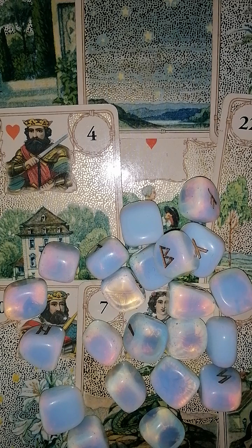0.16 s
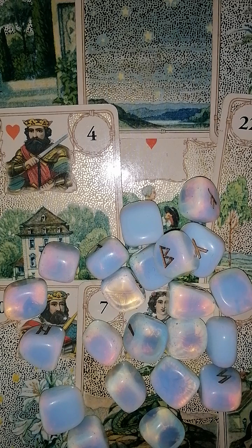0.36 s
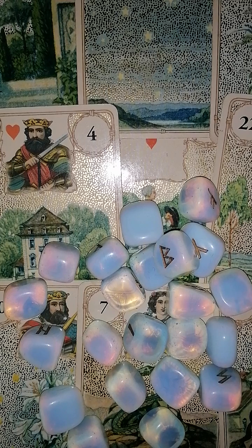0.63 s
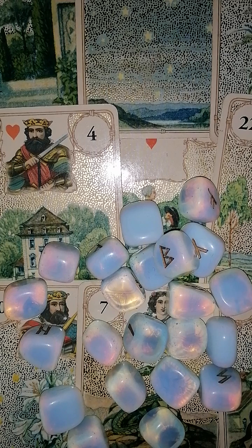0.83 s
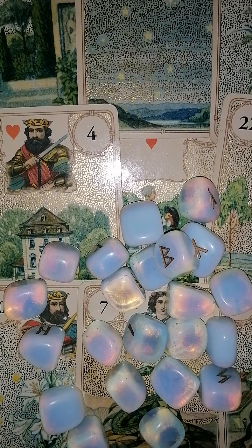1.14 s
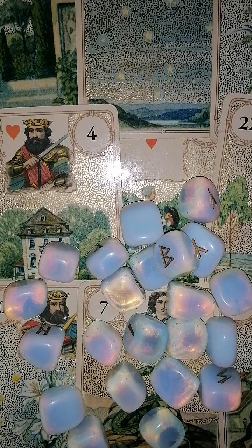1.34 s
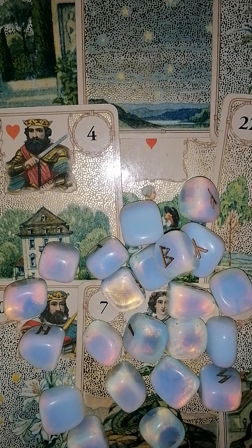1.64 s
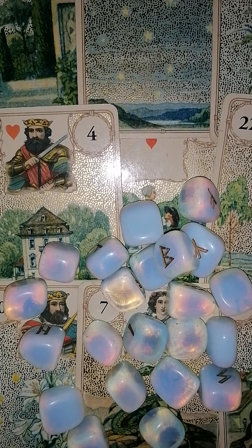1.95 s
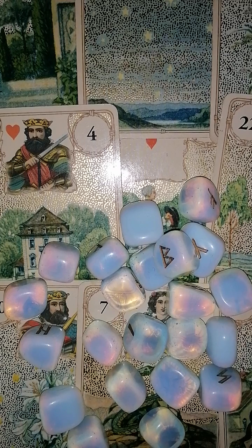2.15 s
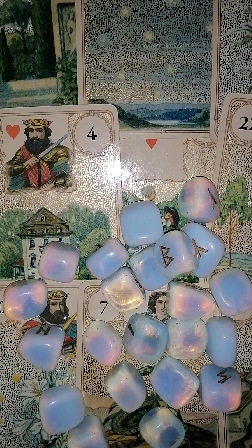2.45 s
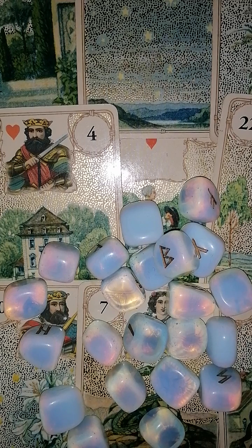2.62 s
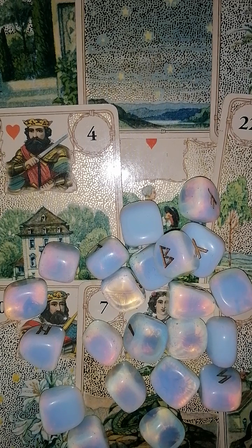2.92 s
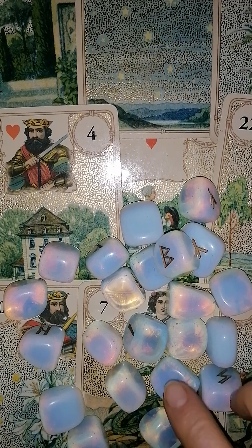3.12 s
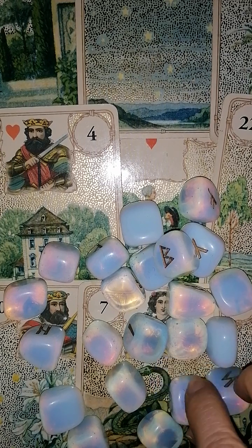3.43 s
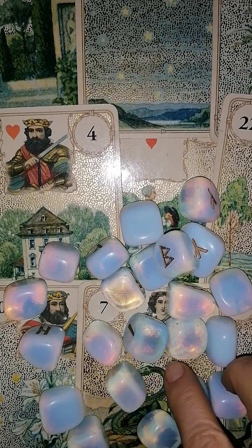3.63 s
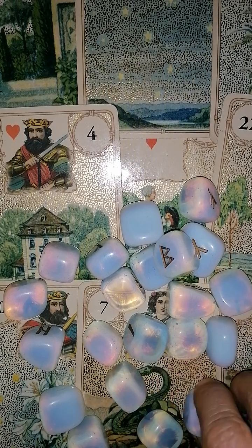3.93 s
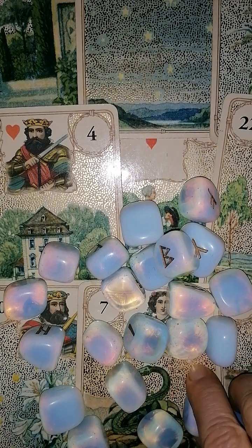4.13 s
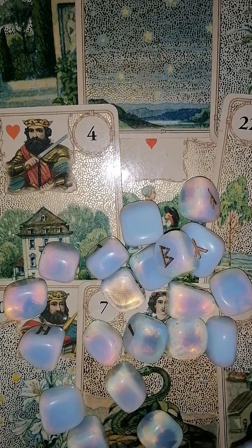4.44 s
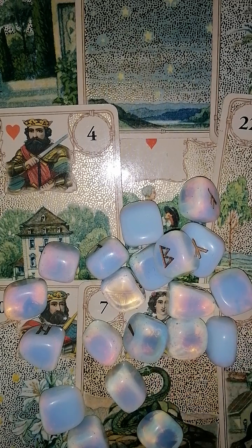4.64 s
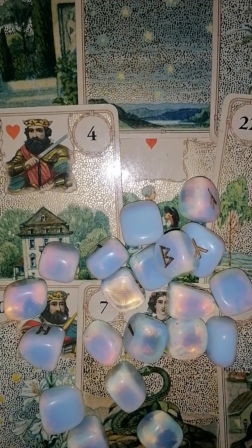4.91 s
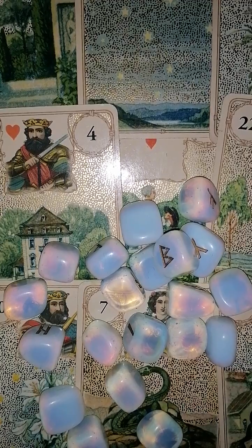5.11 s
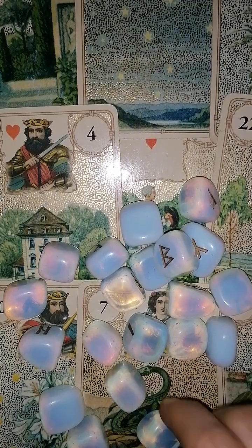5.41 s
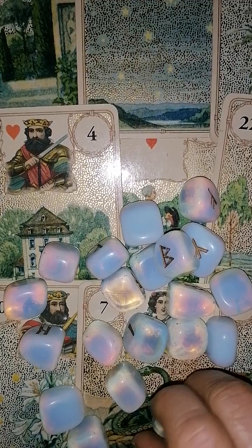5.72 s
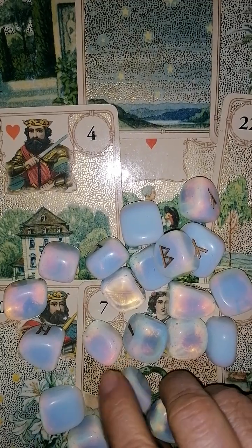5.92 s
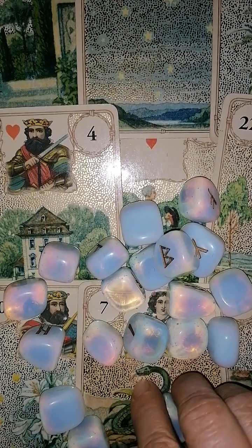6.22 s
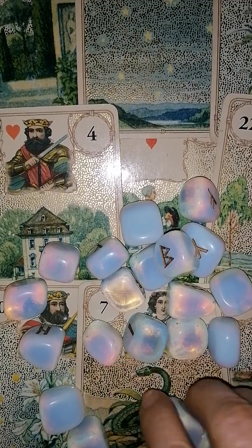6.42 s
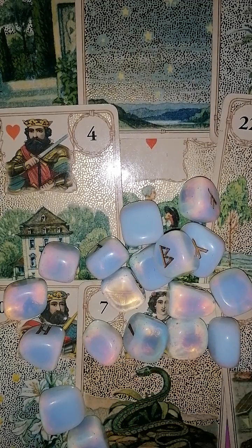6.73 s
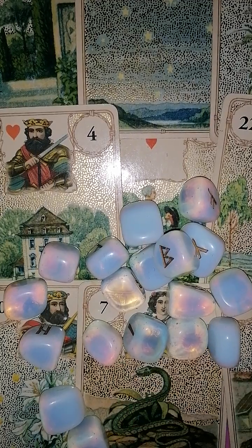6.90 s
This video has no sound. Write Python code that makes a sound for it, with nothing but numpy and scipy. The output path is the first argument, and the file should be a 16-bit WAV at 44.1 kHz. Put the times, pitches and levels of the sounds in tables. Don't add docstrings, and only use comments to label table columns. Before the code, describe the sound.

A quiet small room, heard closely in stereo, with soft low hum and barely audible finger movement for the first 1.5 seconds. At about 1.6 s stones tick lightly together; at 1.8 s one raps a hollow box rim, a short ringing knock. Tiny bouncing ticks come at 2.4-2.7 s with a soft thump. At 2.8 s a stone drops into the box: a loud woody knock and quick smaller bounces until 2.9. From 3 to 5 s stones are pinched off cards with bright ticks, one sharp at 3.54, papery brushes, and dull table thuds, heaviest around 4.7. At 5.15-5.4 s a handful falls in, loud knocks and clicks crowding, then shrinking. A weaker knock comes at 5.8, crisp glassy clicks at 6.1-6.2 toward one side, small ticks at 6.36 and 6.8, and soft skin rubbing fading to quiet at 7 s.

```python
import sys
import numpy as np
from scipy import signal
from scipy.fft import rfft, irfft, next_fast_len
from scipy.io import wavfile
from scipy.ndimage import uniform_filter1d, map_coordinates

SR = 44100
rng = np.random.default_rng(int(sys.argv[2]) if len(sys.argv) > 2 else 0)


def convert_level_to_amplitude(level_db):
    exponent = np.asarray(level_db, float) / 20
    return 10 ** exponent


def to_wav(sig):
    pcm = np.clip(np.atleast_2d(sig), -1, 1) * 32767
    pcm = np.round(pcm).astype(np.int16)
    wavfile.write(sys.argv[1], SR, pcm.T)


N = 311346

# (frequency [Hz], level [dB])
AIR_SPECTRUM = [(12, -33.5), (20, 0), (44, -5), (59, -32), (122, -15.5), (152, -12.5), (205, -22),
                (350, -23), (681, -36.5), (3140, -41), (8300, -52), (10700, -53.5), (15300, -57.5)]
# (frequency [Hz], likeness [0-1])
AIR_LIKENESS = [(60, 0.88), (240, 0.75), (950, 0.065), (3770, 0.053), (15000, 0.5)]
# (frequency [Hz], t60 [s])
ROOM_DECAY = [(150, 0.51), (800, 0.21), (3000, 0.38), (7000, 0.26), (13000, 0.21)]
# (frequency [Hz], gain [dB])
PORT_RESPONSE = [(1000, 0), (3000, -.6), (6000, .6), (10000, -2), (12500, -9), (15000, -16), (17000, -24)]
# (time [s], half length [s], frequency [Hz], width [Hz], level [dB])
FAINT_SWELLS = [(0.099, .04, 2970, 700, -81), (0.458, .03, 262, 80, -67), (0.532, .05, 5500, 3000, -86),
                (1.02, .05, 10500, 2500, -87), (1.09, 0.035, 153, 39.8, -68.5), (3.453, .03, 2130, 203, -65),
                (4.037, 0.033, 1030, 500, -72), (4.038, 0.048, 2990, 1200, -74.5), (4.61, 0.015, 2650, 300, -57),
                (4.65, .045, 2660, 150, -65), (6.75, 0.1, 3960, 300, -72), (1.53, 0.032, 3060, 800, -74.5),
                (1.58, .014, 2970, 900, -59.5), (1.58, .014, 5400, 900, -61), (6.17, 0.05, 2000, 1790, -70),
                (2.129, 0.062, 485, 303, -72), (3.762, 0.048, 905, 600, -77.5), (6.718, 0.11, 1284, 300, -75.5),
                (2.955, .028, 200, 70, -52), (1.815, .015, 200, 100, -55), (4.581, .005, 3000, 5000, -67)]
# (time [s], level [dB])
TABLE_PUSHES = [(1.78, -61.5), (2.8, -55.5), (3.12, -60), (3.28, -50), (3.45, -50.5), (3.85, -62.5),
                (4.15, -55.5), (4.36, -50.5), (4.55, -55.5), (4.75, -43), (4.871, -60), (5.14, -55.5),
                (5.779, -55.5), (5.98, -70)]
# (time [s], level [dB])
TREMOR = [(0, -80), (2.4, -73), (6.2, -67.5), (7.06, -62.5)]
# (frequency [Hz], width [Hz], level [dB])
LEG_MODES = [(60.5, 53, 0)]
# (time of full speed [s], dull rub [dB], bright rustle [dB])
FINGER_STROKES = [(1.579, -71.5, -80.5), (1.85, -64, -79.5), (2.87, -76, -68), (3.191, -75.5, -84.5),
                  (3.901, -74.5, -73.5), (4.3, -74.5, -78.5), (4.42, -62, -96), (4.779, -71, -75.5),
                  (5.27, -66.5, -63), (5.74, -71.5, -68), (6.112, -70, -76), (6.27, -77, -74),
                  (6.42, -72, -90), (6.74, -69, -73.5)]
# (frequency [Hz], level [dB per Hz])
RUB_SPECTRUM = [(300, -26), (600, 0), (1100, 4.5), (2200, -6.5), (4000, -17.5), (8000, -43)]
# (frequency [Hz], level [dB per Hz])
RUSTLE_SPECTRUM = [(1200, -40.5), (2500, 0.5), (4200, -3), (7000, -6), (11000, -11.5), (15000, -29.5)]
# (time [s], peak [dB], left-right [dB], centre [Hz], t60 [s])
CARD_BRUSHES = [(0.858, -67.5, -4, 1380, 0.67), (2.096, -61.5, -1, 5000, 0.57), (3.403, -59, 9.5, 1875, 1),
                (3.412, -61.5, 5.5, 6400, 0.67), (3.50, -60.5, 15, 5620, 0.56),
                (4.351, -57, 7.5, 5300, 0.31), (4.40, -51.5, 6.5, 2930, 0.24), (4.596, -48, 7, 2630, 0.36),
                (4.698, -44.5, 4, 1770, 0.38), (6.06, -65, 5, 6250, 0.37), (6.259, -48, 12, 5600, 0.12)]
# (time [s], peak [dB], left-right [dB], edge [dB])
HAND_THUDS = [(2.358, -59, -4, -25.5), (2.685, -43.5, 0.5, -6), (3.241, -49.5, 5.5, -4.5),
              (3.399, -39.5, 4.5, -4.5), (3.442, -41.5, 4, -14), (4.336, -41.5, 5, 0.5), (4.36, -47, 2, -9),
              (4.409, -44.5, 5.5, -4.5), (4.477, -54, 4.5, -23), (4.598, -49, 2.5, -3),
              (4.688, -35, 6.5, -7), (4.737, -37, 4.5, -12), (4.767, -33.5, 5.5, -11.5),
              (4.805, -47, -1.5, -22)]
# (frequency [Hz], width [Hz], level [dB])
TABLE_MODES = [(109.9, 31, -6.5), (151, 34, 2), (250.4, 22, 0.5), (293, 41, -4)]
# (frequency [Hz], width [Hz], level [dB])
EDGE_MODES = [(433, 110, 10), (600, 150, -5), (778, 440, -1), (1310, 150, -11)]
# (time [s], peak [dB], left-right [dB], centre [Hz], t60 [s])
CARD_TAPS = [(1.558, -56, 2, 760, 0.12), (1.576, -55.5, -8, 644, 0.029), (1.804, -46, -11, 1080, 0.048),
             (2.356, -64.5, 0.5, 600, 0.048), (3.491, -65, 3, 900, .03), (3.498, -62, 13, 3290, .02),
             (3.515, -63.5, 3, 900, 0.03), (3.543, -57.5, 0.5, 950, 0.029), (3.565, -63.5, 4, 950, 0.029),
             (3.568, -58, 9, 2180, 0.016), (4.003, -57, 1, 1110, 0.022), (4.137, -64, 4.5, 900, 0.021),
             (4.147, -60, 13, 2000, 0.017), (4.145, -53.5, 3, 740, 0.023), (4.181, -47.5, -2, 880, 0.016),
             (4.194, -53.5, 17, 2100, 0.031), (4.202, -52, 4, 2000, 0.034), (4.203, -58.5, 2, 900, 0.064),
             (4.314, -62, 13, 1220, 0.15), (4.599, -45, 4.5, 1290, 0.11), (4.606, -52, 9.5, 860, 0.12),
             (5.099, -67.5, 4.5, 910, 0.041), (5.7133, -45, 2.5, 1100, 0.022),
             (5.915, -69, 7.5, 943, 0.025), (5.947, -55.5, 3.5, 1143, 0.019),
             (6.115, -52.5, 10, 1500, 0.026), (6.145, -49.5, 12, 1690, 0.02), (6.165, -53, 3, 1760, 0.021),
             (6.178, -50.5, 7, 1770, 0.036), (6.243, -50.5, 3, 958, 0.016), (6.254, -62.5, 3, 837, 0.014),
             (4.34, -67, 11, 1600, 0.096), (6.36, -60, 5, 2000, 0.047)]
# (time [s], peak [dB], left-right [dB], contact [ms])
FLOOR_KNOCKS = [(1.63, -40, -1, 0.53), (2.1, -55, -6, 0.1), (2.8096, -7.5, 0, 0.45),
                (2.8273, -15, -1.5, 0.6), (2.849, -28.5, -2.5, 1.3), (2.8977, -17, -3.5, 1.06),
                (2.884, -38, -3, 2.1), (2.916, -33, -7, 1.26), (2.807, -22, 0.5, 1.5),
                (5.1491, -9.5, 0, 1.04), (5.1549, -6, 3, 0.27), (5.1766, -11, 2, 0.43),
                (5.2122, -21, 3, 1.5), (5.2143, -7, 4, 0.38), (5.188, -26.5, 2.5, 0.54),
                (5.24, -26, 4, 0.56), (5.2262, -11, 6, 0.44), (5.262, -19.5, 0, 0.46),
                (5.2908, -14.5, 3.5, 0.61), (5.309, -30.5, 3, 1), (5.3505, -21.5, 0, 0.82),
                (5.3521, -6.5, 3.5, 0.31), (5.369, -26.5, 2, 0.72), (5.388, -33, 6, 0.6),
                (5.41, -36, 2, 0.39), (5.696, -43.5, -0.5, 1.16), (5.7886, -20, -2, 1.06),
                (5.197, -30, 2, 1.2), (5.279, -28.5, 2, 0.47)]
# (frequency [Hz], width [Hz], signed share at left port, at right port)
FLOOR_MODES = [(355, 85, -.46, -.12), (429, 86, .29, .18), (524, 55, -.03, .08), (610, 341, -.06, -.12),
               (751, 40, .01, .15), (841, 78, .95, .2), (903, 112, -.53, -.28), (1067, 49, .28, .02),
               (1151, 86, -.29, .06), (1271, 78, .37, -.19), (1500, 100, -.2, .08), (1728, 110, -.17, -.08),
               (2016, 55, .04, .09), (2544, 350, .01, -.11)]
# (time [s], peak [dB], left-right [dB], contact [ms])
RIM_HITS = [
    (1.8024, -17, 1.5, 0.58),
    (1.809, -24, 9.5, 0.88),
]
# (frequency [Hz], width [Hz], signed share at left port, at right port)
RIM_MODES = [(180, 78, 0.034, 0.21), (343, 16, -0.072, -1.4), (507, 34, 0.006, 0.65),
             (627, 16.5, -0.14, -1.2), (786, 55, -0.058, 0.97), (875, 70, 0.052, -0.63),
             (963, 54, 0.082, 1), (1077, 41, -0.74, -0.26), (1230, 80, 0.45, 0.57),
             (1320, 76, -0.63, -0.033), (1860, 57, 0.099, 0.19), (2410, 140, 0.18, 0.32)]
# (frequency [Hz], width [Hz], level [dB])
LOOSE_STONES = [(600, 900, 3), (1380, 1700, 3.5), (2570, 590, 3)]
# (time [s], peak [dB], left-right [dB], centre [Hz], top sparkle [dB])
STONE_CLICKS = [(1.5579, -42, -8, 5300, -6), (1.5683, -46, 0, 5300, -24), (1.8006, -43, -8, 3240, -17.5),
                (2.1027, -56, 4, 4980, 8), (2.7643, -46.5, -3.5, 4750, -17), (2.81, -44, -3.5, 2980, 6),
                (2.821, -27, -7, 6490, -7.5), (2.8424, -40.5, 2, 6000, -3), (5.1542, -21, -3.5, 5330, -17),
                (5.1734, -21.5, 4, 6500, -3.5), (5.2116, -50, 10, 2950, 7.5),
                (5.222, -27, 11.5, 7700, -10.5), (5.2278, -27, -6.5, 8060, -12.5),
                (5.259, -31.5, 4.5, 5180, -8.5), (5.2895, -32, 10, 6300, -12.5),
                (5.336, -36.5, 12.5, 5500, -20), (5.3716, -36.5, 8.5, 5500, -12.5),
                (5.3836, -39, -1.5, 5810, -16.5), (5.3936, -39.5, -3, 6000, -19),
                (5.3998, -42, -10, 5770, -21)]
# (time [s], peak [dB], left-right [dB], centre [Hz], low body [dB])
FINGER_CLICKS = [(1.5579, -47, 4, 3000, -22), (2.418, -60.5, -11, 2570, -10), (2.941, -38, 11, 4890, -10.5),
                 (3.0465, -44, 11.5, 4460, -15.5), (3.094, -50, 10, 4700, -13),
                 (3.112, -53.5, 8, 4250, -17), (3.492, -52.5, -2, 3400, 1), (3.516, -59, 2, 3600, -4),
                 (3.5426, -29, 3, 5570, -29), (3.5792, -39, 10, 5300, -26), (3.815, -58, 2.5, 4590, -18),
                 (4.138, -63, 4, 3390, -2), (4.145, -53, 2, 3380, -3), (4.1815, -43.5, 10.5, 2710, -3),
                 (4.2294, -55.5, 13, 3760, 2), (4.716, -45.5, 9, 4400, -21), (4.731, -49, 13, 4450, -20),
                 (4.7412, -49.5, 15, 4430, -11), (4.997, -59.5, 7.5, 4130, -7.5),
                 (5.683, -42, -10, 5460, -17.5), (5.6954, -41.5, 5, 5140, -4),
                 (5.7552, -58.5, 12.5, 4920, -12), (5.803, -52, 7, 5510, -2), (5.811, -57, 4, 4800, -3),
                 (5.8298, -46.5, 1.5, 6250, -12), (5.875, -59, 9, 5850, -14), (6.1154, -24, 7, 5920, -10),
                 (6.1465, -27.5, 9.5, 5960, -9.5), (6.165, -33.5, 4, 5870, -6),
                 (6.1783, -37.5, 15, 5630, -20), (6.1861, -41, 12, 5620, -10), (6.741, -63, 9, 7080, -9),
                 (6.778, -40.5, 3.5, 6260, -1.5)]
# (time [s], peak [dB], left-right [dB], first gap [s], loss [dB per bounce])
BOUNCES = [(1.577, -48, 5, 0.0091, 4), (2.419, -31, -5.5, 0.003, 5.5), (2.5881, -39.5, -8.5, 0.0067, 4.5),
           (2.662, -55, -6.5, 0.0027, 0.5), (3.1236, -52.5, 14, 0.0095, 1.5), (4.194, -55, -3.5, 0.0085, 2),
           (4.7503, -45, 9.5, 0.0077, 1.1), (4.837, -32.5, 0, 0.0021, 2), (4.954, -32, -3.5, 0.0031, 4.5),
           (5.032, -46.5, -1.5, 0.005, 0.36), (5.4068, -42.5, 12.5, 0.0115, 3),
           (5.703, -35.5, -2, 0.0066, 2.2), (6.192, -32, 11.5, 0.0039, 2.36),
           (6.3582, -34.5, 10, 0.0036, 2), (6.788, -42, 7.5, 0.0049, 2.5)]


def unit(x):
    return x / np.sqrt(np.mean(x ** 2) + 1e-20)


def along(points, hz):
    f, v = np.transpose(points)
    return np.interp(np.log(hz + 1), np.log(f + 1), v)


def filtered(x, response):
    n = x.shape[-1]
    m = next_fast_len(n + 4096)
    return irfft(rfft(x, m) * response(np.fft.rfftfreq(m, 1 / SR)), m)[..., :n]


def resonance(f, hz, width_hz):
    return 1j * f * width_hz / (hz * hz - f * f + 1j * f * width_hz)


def modes(rows):
    return lambda f: sum((-1) ** k * convert_level_to_amplitude(db) * resonance(f, hz, width)
                         for k, (hz, width, db) in enumerate(rows))


def above(f, hz):
    return (1j * f / hz / (1 + 1j * f / hz)) ** 2


def add(out, s, sound, db, pan_db, lag_s):
    pair = sound / np.abs(sound).max() * np.ones((2, 1))
    pair = np.pad(pair, ((0, 0), (0, 64)))
    pair[0] = np.roll(pair[0], round(lag_s * SR))
    span = out[:, round(s * SR):][:, :pair.shape[1]]
    span += convert_level_to_amplitude(db + np.array([[pan_db / 2], [-pan_db / 2]])) * pair[:, :span.shape[1]]


def rush(spectrum, alike, patchy_db):
    z = signal.stft(rng.standard_normal((2, N)), nperseg=512)[2]
    patches = uniform_filter1d(rng.standard_normal(z.shape[1:]), size=8, axis=0)
    patches = uniform_filter1d(patches, size=10, axis=1)
    pair = signal.istft(z * convert_level_to_amplitude(patchy_db * unit(patches)), nperseg=512)[1][:, :N]

    def mid_side(hz):
        turn = np.arccos(np.clip(along(alike, hz), -1, 1)) / 2
        return convert_level_to_amplitude(along(spectrum, hz)) * [np.cos(turn), np.sin(turn)]

    mid, side = filtered(pair, mid_side)
    return unit(np.array([mid + side, mid - side]))


def room_tone():
    return convert_level_to_amplitude(-66 + np.array([[-.8], [.8]])) * rush(AIR_SPECTRUM, AIR_LIKENESS, patchy_db=.5)


def room(x):
    out, step = np.zeros((2, N + 2 * SR)), SR // 4
    for at in range(0, N, step):
        hz, t, z = signal.stft(rng.standard_normal((2, SR // 2)), SR, nperseg=256)
        decay = convert_level_to_amplitude(-60 * t / along(ROOM_DECAY, hz)[:, None])
        tail = signal.istft(z * decay, SR, nperseg=256)[1]
        wet = signal.fftconvolve(x[:, at:at + step], tail / np.linalg.norm(tail[0]), axes=1)
        out[:, at + 250:][:, :wet.shape[1]] += wet
    return out[:, :N]


def faint_swells():
    out = np.zeros((2, N))
    t = np.arange(-SR // 4, SR // 4) / SR
    for s, half_s, hz, width_hz, db in FAINT_SWELLS:
        noise = rng.standard_normal((2, len(t)))
        hiss = unit(filtered(noise, lambda f: modes([(hz, width_hz, 0)])(f) ** 2))
        swell = convert_level_to_amplitude(db) * np.exp(-(t / half_s) ** 2)
        at = round(s * SR) - SR // 4
        out[:, max(at, 0):at + len(t)] += (swell * hiss)[:, max(-at, 0):]
    return out


def sway():
    swell_s, t60_s = 0.051, 0.9
    t = np.arange(N) / SR
    power = convert_level_to_amplitude(np.interp(t, *np.transpose(TREMOR))) ** 2
    for s, db in TABLE_PUSHES:
        since = np.maximum(t - s + swell_s, 0)
        swing = convert_level_to_amplitude(db + 4.5 - 60 * since / t60_s) * (1 - np.exp(-since / swell_s))
        power = power + swing ** 2
    return np.sqrt(power)


def rocking():
    rock = filtered(rng.standard_normal(N), lambda f: modes(LEG_MODES)(f) ** 2)
    envelope = np.abs(signal.hilbert(rock, next_fast_len(N))[:N])
    rock /= envelope + .9 * rock.std()
    return sway() * convert_level_to_amplitude([[1.5], [-2.5]]) * unit(rock)


def fingers():
    t = np.arange(N) / SR
    rub, rustle = convert_level_to_amplitude(-87), convert_level_to_amplitude(-87)
    for s, rub_db, rustle_db in FINGER_STROKES:
        speed = convert_level_to_amplitude(np.minimum(131 * (t - s), 100.5 * (s - t)))
        rub = rub + convert_level_to_amplitude(rub_db) * speed
        rustle = rustle + convert_level_to_amplitude(rustle_db) * speed
    coarse = rng.standard_normal(N // 150 + 4)
    grain = unit(convert_level_to_amplitude(2.2 * map_coordinates(coarse, [np.arange(N) / 150])))
    body = rush(RUB_SPECTRUM, [(1000, 0.24)], patchy_db=2.5)
    bright = rush(RUSTLE_SPECTRUM, [(4000, 0.1)], patchy_db=3.5)
    return grain * (rub * body + rustle * bright)


def brushes():
    out, t = np.zeros((2, N)), np.arange(SR // 3) / SR
    for s, db, pan_db, hz, t60 in CARD_BRUSHES:
        rise = 1 - np.exp(-t / (0.0088 * t60))
        stroke = rng.standard_normal((2, len(t))) * convert_level_to_amplitude(-60 * t / t60) * rise
        stroke = filtered(stroke, lambda f: modes([(hz, hz * 1.1, 0)])(f) ** 2)
        add(out, s, stroke, db, pan_db, lag_s=0)
    return out


def thuds():
    out, t = np.zeros((2, N)), np.arange(SR // 2) / SR
    for s, db, pan_db, edge_db in HAND_THUDS:
        shake = rng.standard_normal((2, len(t))) * convert_level_to_amplitude(-60 * t / 0.24) * (1 - np.exp(-t / 0.00075))
        low, edge = filtered(shake, lambda f: 1 / (1 + 1j * f / 1500) ** 2)
        add(out, s, filtered(low, modes(TABLE_MODES)), db, pan_db, lag_s=0.0001)
        add(out, s, filtered(edge, modes(EDGE_MODES)), db + edge_db + 4.5, pan_db, lag_s=0.00022)
    return out


def taps():
    out, t = np.zeros((2, N)), np.arange(SR // 12) / SR
    for s, db, pan_db, hz, t60 in CARD_TAPS:
        scuff = rng.standard_normal(len(t)) * convert_level_to_amplitude(-60 * t / t60)
        surface = modes([(hz, 450, 0), (hz * 2.1, 700, -8)])
        tap = filtered(scuff, lambda f: surface(f) / (1 + 1j * f / 3500) ** 2)
        add(out, s, tap, db + 8, pan_db, lag_s=0.00019)
    return out


def box():
    out, t = np.zeros((2, N)), np.arange(SR // 12) / SR
    blow, long_blow = np.zeros(len(t)), np.zeros(SR // 4)
    blow[0] = long_blow[0] = 1
    settling = convert_level_to_amplitude(-7 / (1 + np.exp((.0125 - t) / .0012)))
    blows = [(FLOOR_MODES, row) for row in FLOOR_KNOCKS] + [(RIM_MODES, row) for row in RIM_HITS]
    for body, (s, db, pan_db, contact_ms) in blows:
        spot = convert_level_to_amplitude(rng.normal(0, .8, len(body)))

        def soft(f):
            return (1 + 1j * f * contact_ms / 1000) ** -4

        def ring(f):
            return sum(gain * np.array([[left], [right]]) * resonance(f, hz, width)
                       for gain, (hz, width, left, right) in zip(spot, body))

        knock = settling * filtered(blow, lambda f: ring(f) * soft(f))
        add(out, s, knock, db, pan_db, lag_s=0)
        shaken = rng.standard_normal(len(t)) * convert_level_to_amplitude(-60 * t / 0.032) * (1 - np.exp(-t / 0.0015)) ** 2
        grit = filtered(shaken, lambda f: modes(LOOSE_STONES)(f) * soft(f))
        add(out, s, grit, db - 13, pan_db + 7, lag_s=0.00058)
        carried = filtered(long_blow, lambda f: modes(TABLE_MODES)(f) * soft(f))
        add(out, s, carried, db - 32, 3, lag_s=0)
    return out


def click(hz, top_db, low_db):
    t = np.arange(700) / SR
    scatter = rng.standard_normal((2, len(t))) * convert_level_to_amplitude(-13.5 - 60 * t / 0.016) * (1 - np.exp(-t / .00015))
    scatter = filtered(scatter, modes([(hz * 0.91, 4500, 0)]))
    scatter[:, 0] = 1
    scatter[:, 145] += convert_level_to_amplitude(-11)
    spark = modes([(hz * 0.45, 1600, low_db), (hz, 2400, 0), (hz * 1.576, 3500, -6)])
    sparkle = modes([(10890, 2400, top_db)])
    return filtered(scatter, lambda f: (spark(f) + sparkle(f)) * above(f, 770))


def stones():
    out, bounce = np.zeros((2, N)), np.arange(12)
    late_s, lag_s = .0008, .00029
    for s, db, pan_db, hz, top_db in STONE_CLICKS:
        add(out, s + late_s, click(hz, top_db, low_db=-9), db + 6.5, pan_db, lag_s)
    for s, db, pan_db, hz, low_db in FINGER_CLICKS:
        top_db = -23 + 0.5 * (db + 40)
        add(out, s + late_s, click(hz, top_db, low_db), db + 6.5, pan_db, lag_s)
    for s, db, pan_db, gap, loss_db in BOUNCES:
        gaps = gap * .84 ** bounce * convert_level_to_amplitude(rng.normal(0, .3, len(bounce)))
        times = s + np.cumsum(gaps) - gaps
        uneven_db = rng.normal(0, 1, len(bounce)) * (bounce > 0)
        levels = db + 0.5 - loss_db * bounce + uneven_db
        hz = 5300 + 63.5 * (db + 38)
        tick = click(hz, -24 + 0.5 * (db + 36.5), low_db=-4.5)
        for at, level_db in zip(times, levels):
            add(out, at + late_s, tick, level_db, pan_db, lag_s)
    return out


def scene():
    bright, hollow, low = stones(), box() + taps(), thuds()
    distant = filtered(hollow, lambda f: 1 - modes([(390, 140, -4)])(f) - modes([(865, 160, -4)])(f))
    wet = room(convert_level_to_amplitude(-14.5) * bright + convert_level_to_amplitude(-14) * distant + convert_level_to_amplitude(-11) * low)
    near = bright + hollow + low + brushes() + wet
    near = filtered(near, lambda hz: convert_level_to_amplitude(along(PORT_RESPONSE, hz)))
    return near + rocking() + fingers() + room_tone() + faint_swells()


def band_limit(x):
    return signal.sosfilt(signal.butter(12, 16370, fs=SR, output="sos"), x)


def record(dry):
    band = filtered(dry, lambda hz: convert_level_to_amplitude(-7 * (hz > 15450)))
    mix = band / (1 + np.abs(band / .85) ** 4) ** (1 / 4)
    return band_limit(mix)


dry = scene()
out = record(dry)
to_wav(out)
```